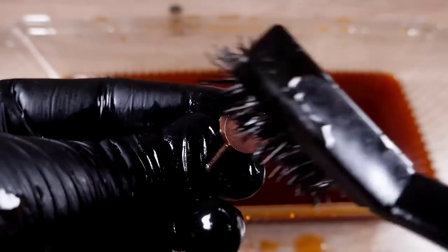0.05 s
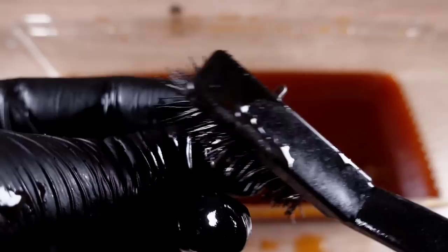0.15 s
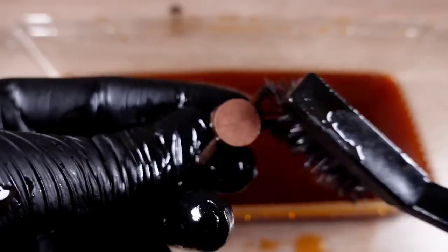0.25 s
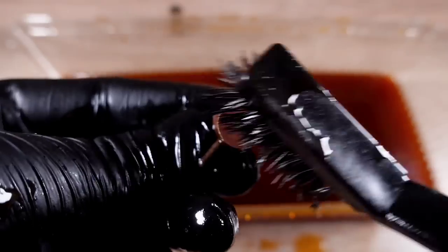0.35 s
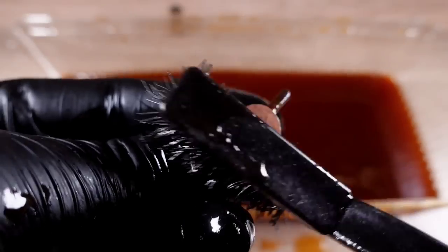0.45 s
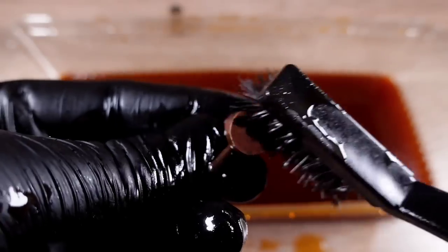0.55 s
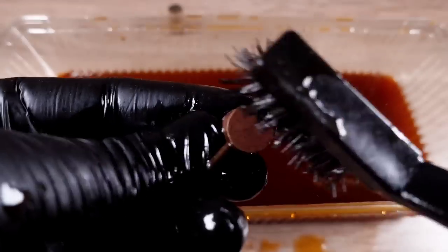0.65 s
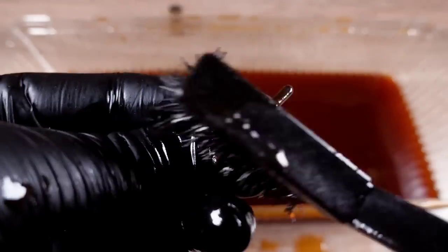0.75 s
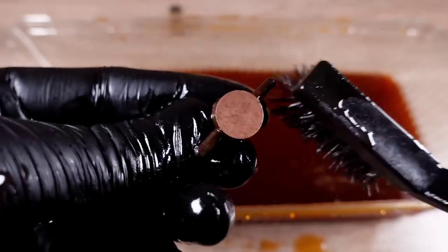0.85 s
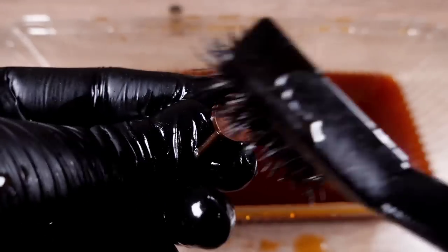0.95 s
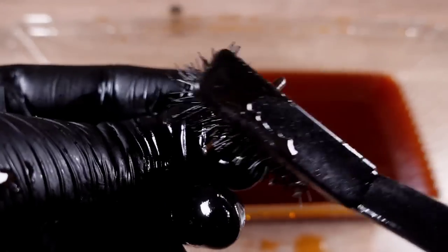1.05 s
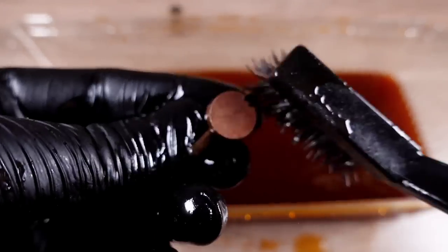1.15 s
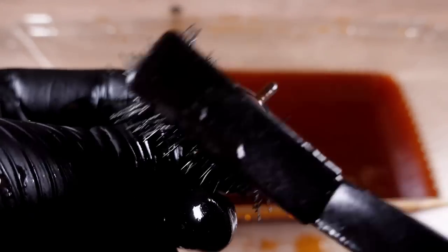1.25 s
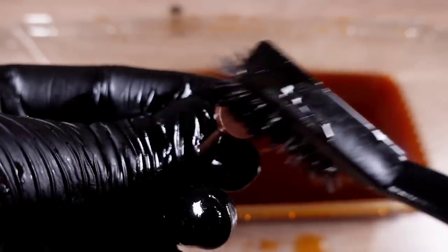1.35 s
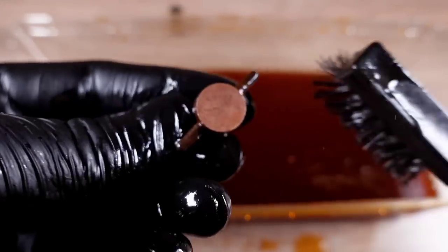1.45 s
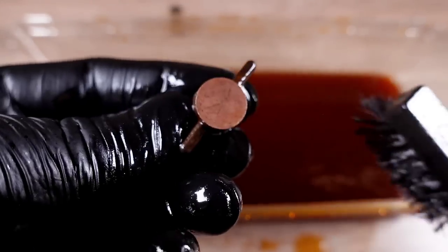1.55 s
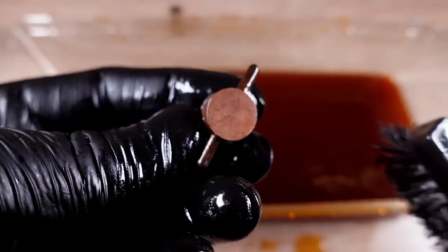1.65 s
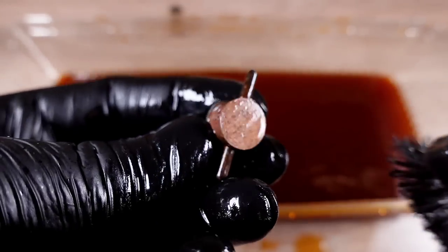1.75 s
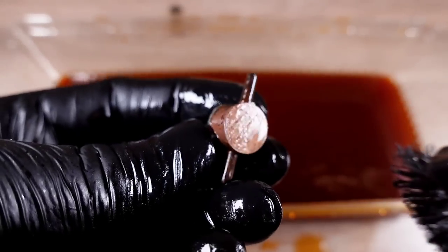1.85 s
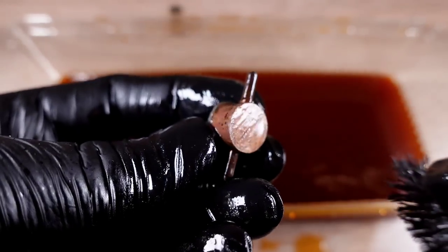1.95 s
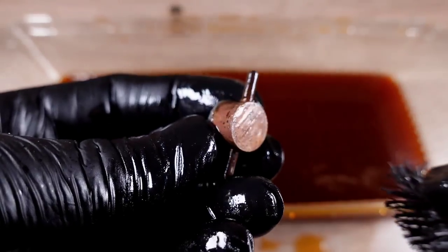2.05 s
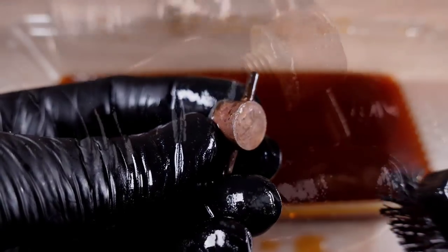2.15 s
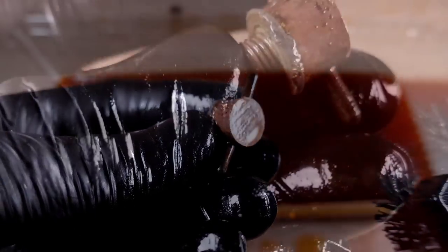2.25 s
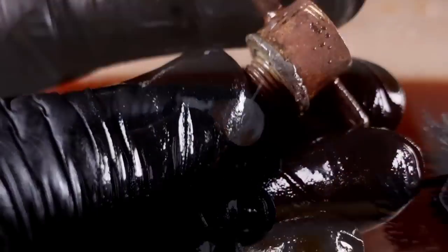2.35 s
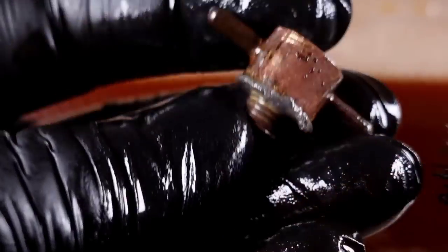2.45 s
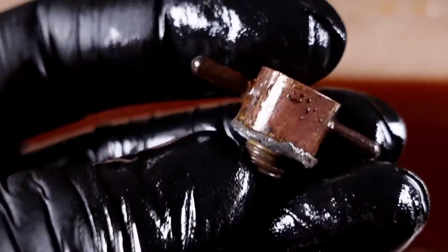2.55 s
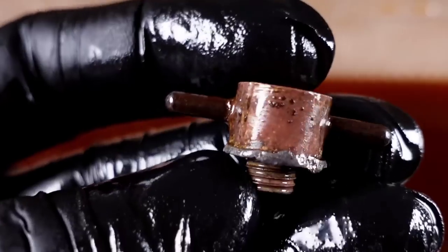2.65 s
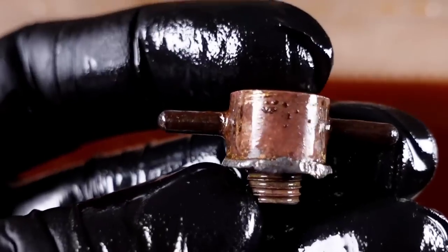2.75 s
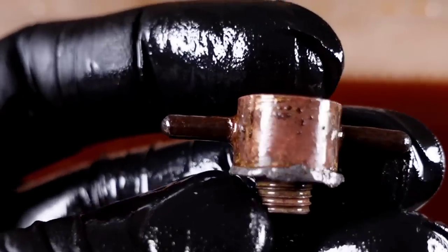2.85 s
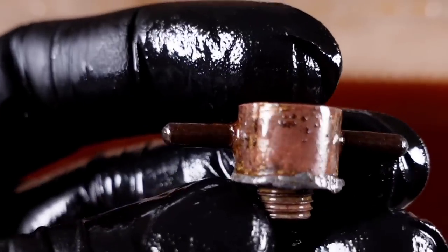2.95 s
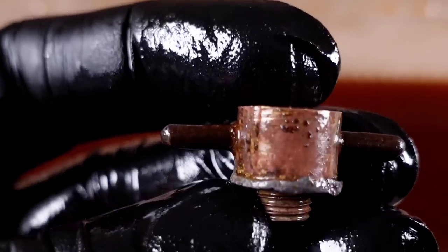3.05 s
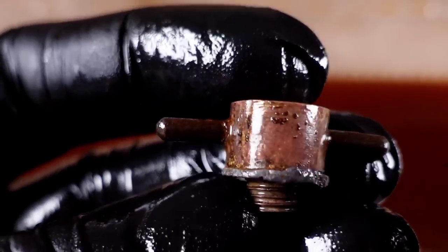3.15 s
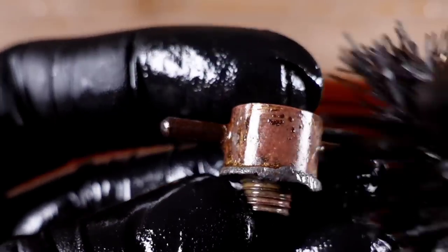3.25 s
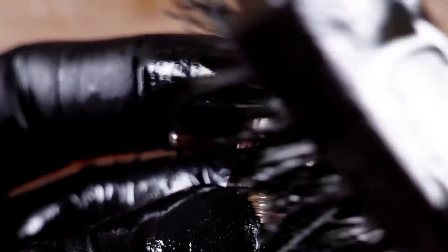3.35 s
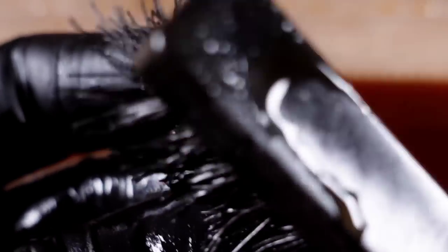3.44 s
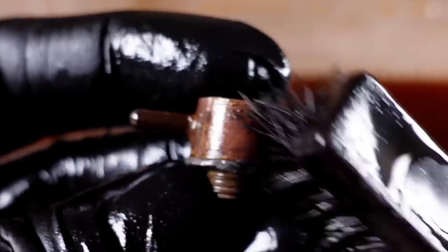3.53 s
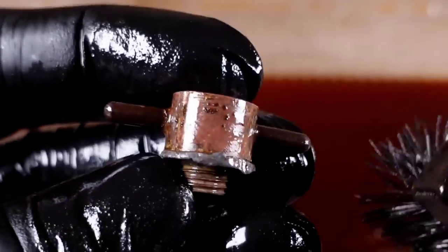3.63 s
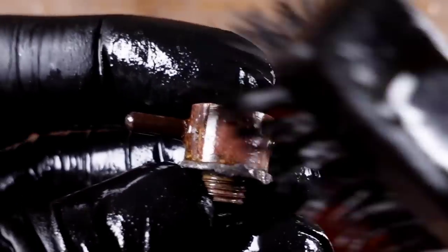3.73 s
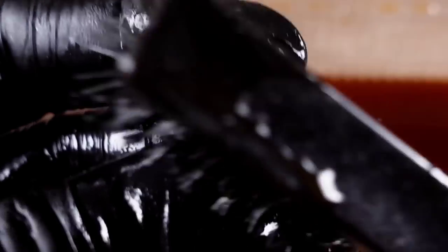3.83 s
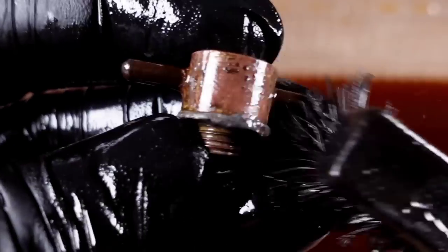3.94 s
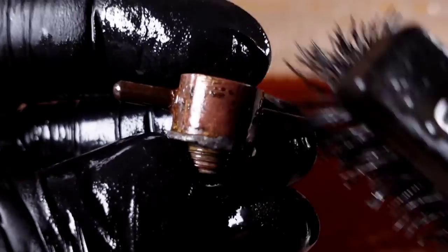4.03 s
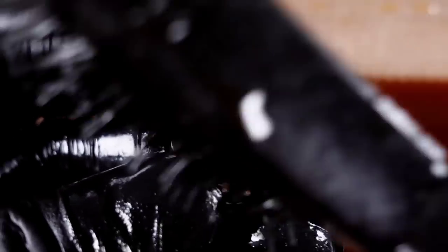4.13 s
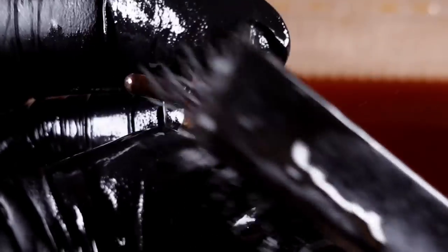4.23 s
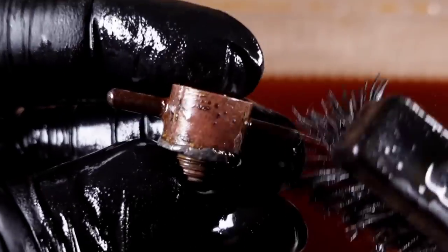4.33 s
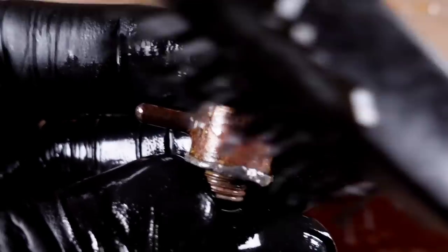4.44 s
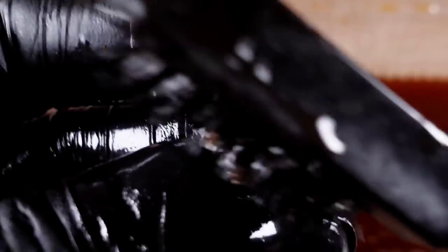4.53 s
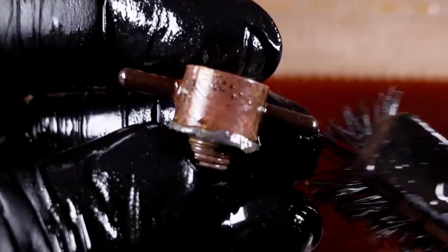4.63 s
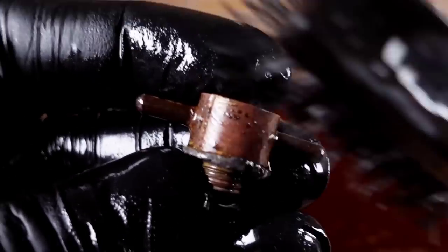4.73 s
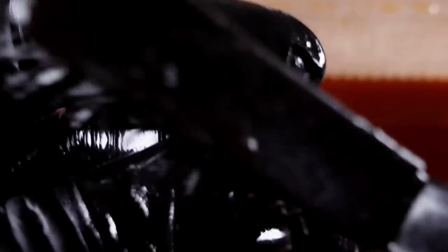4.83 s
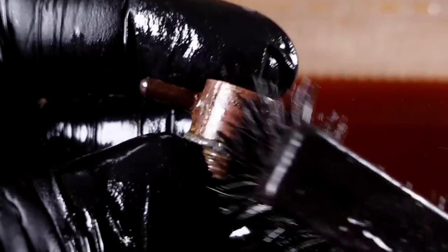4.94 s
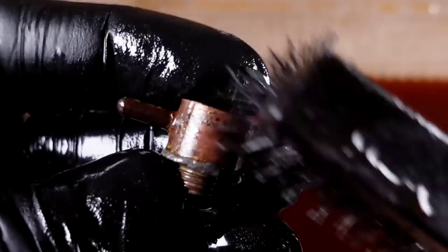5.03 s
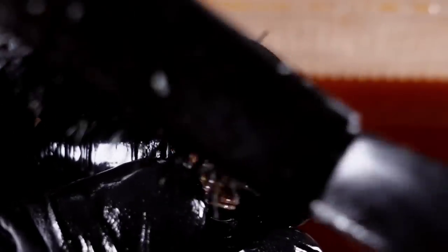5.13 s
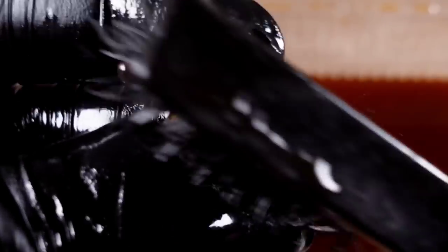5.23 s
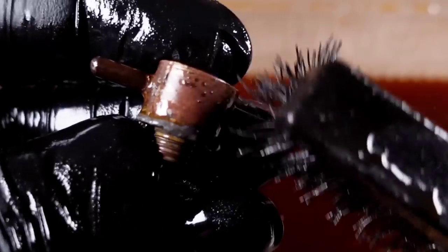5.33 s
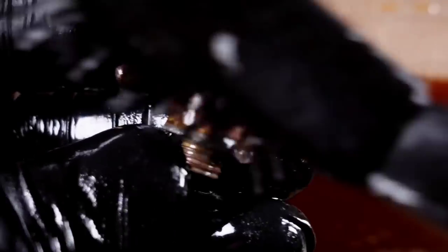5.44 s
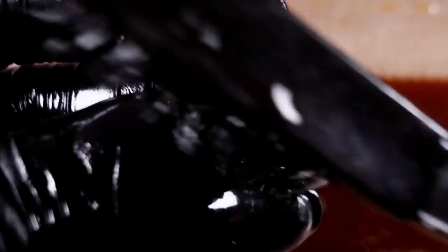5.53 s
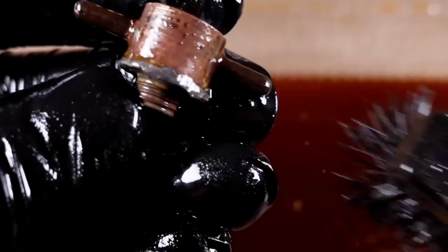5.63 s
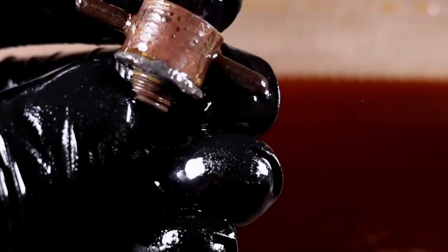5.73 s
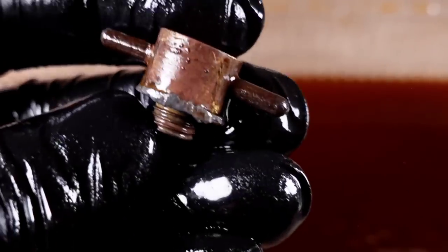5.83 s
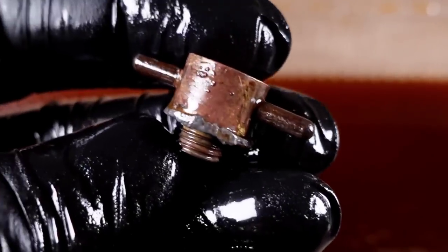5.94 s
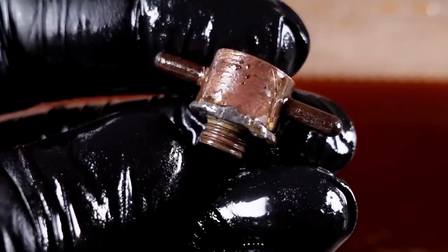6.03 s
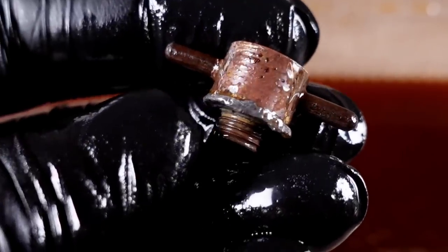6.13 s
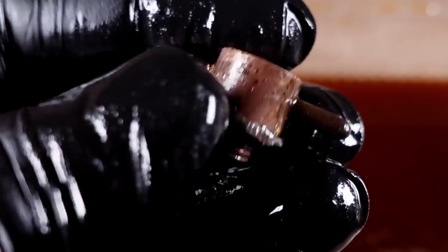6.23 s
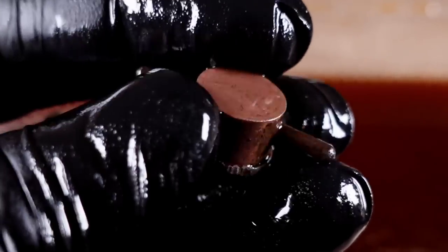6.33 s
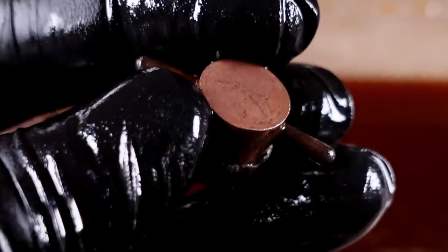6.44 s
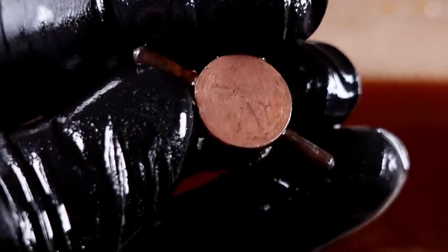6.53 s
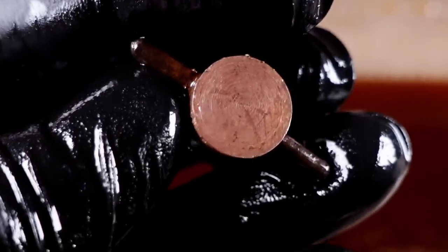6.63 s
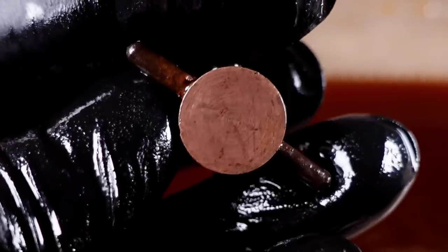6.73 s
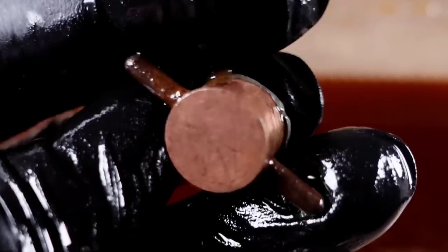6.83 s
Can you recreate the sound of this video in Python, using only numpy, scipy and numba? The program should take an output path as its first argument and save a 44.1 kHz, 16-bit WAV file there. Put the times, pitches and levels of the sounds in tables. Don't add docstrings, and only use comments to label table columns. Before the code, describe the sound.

Short, dry brush strokes on metal, crisp and spitting, recorded close in a small room. The first group is irregular and light with soft hand bumps; after a quiet gap of barely audible rubber rubbing, a steadier, stronger group rasps about three times a second, bristles flicking off the rim with brief dull rings. It ends on a hard knock, then faint glove ticks above low rumble and wavering machine hum.

```python
import sys
import numpy as np
from scipy import signal
from scipy.fft import rfft, irfft, next_fast_len
from scipy.io import wavfile
from scipy.ndimage import uniform_filter1d
from numba import njit

SR = 44100
rng = np.random.default_rng(int(sys.argv[2]) if len(sys.argv) > 2 else 0)


def undo_db(level):
    steps = np.asarray(level, float) / 20
    return 10 ** steps


def store_pcm(level_fs):
    pcm = np.round(np.clip(level_fs, -1, 1) * 32767).astype(np.int16)
    wavfile.write(sys.argv[1], SR, np.atleast_2d(pcm).T)


N = 303849
T = np.arange(N) / SR
REGRIP_S = 2.5


def level(x, db):
    return x * undo_db(db) / np.sqrt(np.mean(x ** 2))


def colour(x, points):
    hz, db = np.transpose(points)
    size = next_fast_len(len(x))
    f = np.arange(size // 2 + 1) * SR / size + 1
    gain_db = np.interp(np.log(f), np.log(hz), db)
    return irfft(rfft(x, size) * undo_db(gain_db), size)[:len(x)]


def mode(x, hz, t60):
    pole = np.exp(2j * np.pi * hz / SR - np.log(1000) / (t60 * SR))
    return signal.lfilter([1], [1, -pole], x).imag


def narrow(hz, width, count=N):
    t60 = np.log(1000) / (np.pi * width)
    return level(mode(rng.standard_normal(count), hz, t60), 0)


def walk(rate):
    k = int(SR / rate)
    held = np.repeat(rng.standard_normal(N // k + 1), k)
    return 1.262 * uniform_filter1d(uniform_filter1d(held, k), k)[:N]


def samples(s):
    return (s * SR).astype(np.int64)


@njit
def grains(length, start, hz, cycles, size):
    out = np.zeros(length)
    for k in range(len(start)):
        rise = cycles[k] * SR / hz[k]
        pole = np.exp(2j * np.pi * hz[k] / SR - 1 / rise)
        z = size[k] * np.e / rise + 0j
        for i in range(min(length - start[k], int(9 * rise))):
            out[start[k] + i] += i * z.imag
            z *= pole
    return out


def fading(s, db, fall_s):
    starts = np.bincount(samples(s), undo_db(db), N)
    steps = signal.lfilter([1], [1, -np.exp(-1 / (fall_s * SR))], starts)
    return uniform_filter1d(steps, int(.0019 * SR))


def body(x, modes):
    out = np.zeros(N)
    for k, (hz, face_db, side_db, t60) in enumerate(modes):
        weight = np.where(T < REGRIP_S, undo_db(face_db), undo_db(side_db))
        out += (-1) ** k * weight * mode(x, hz, t60)
    return out


# start_s, peak_db
FACE_SNAPS = [(0.012, -22), (0.021, -27), (0.04, -22), (.2661, -32), (.2804, -25), (0.3153, -39),
              (.3207, -31), (.567, -28), (.5715, -36), (.5831, -27), (0.6018, -33), (0.6455, -26),
              (.6906, -43), (.702, -47), (.719, -37), (0.833, -36.5), (0.862, -31), (0.876, -25),
              (.887, -27), (.903, -25), (0.9125, -27), (0.9277, -35), (1.134, -31), (1.1475, -28),
              (1.1963, -34), (1.2165, -37), (1.292, -34), (1.3906, -29), (1.439, -21), (1.462, -35)]
# start_s, peak_db
PECKS = [(0.533, -40), (1.3767, -37), (1.407, -29), (1.455, -32), (3.5384, -43), (3.5474, -36),
         (3.558, -32), (3.606, -33), (3.829, -50), (3.9181, -40), (3.9348, -26), (3.954, -29), (3.962, -26),
         (4.277, -32), (4.291, -17.5), (4.586, -54), (4.6027, -47), (4.9162, -23.5), (4.9282, -39),
         (4.938, -21), (4.952, -42), (5.2545, -30), (5.26, -29), (5.2733, -25.5), (5.2793, -40.5),
         (5.2996, -41), (5.575, -29), (5.598, -25), (5.617, -39)]
# start_s, peak_db
SIDE_SNAPS = [(3.6134, -29), (3.6194, -17.5), (3.626, -23), (3.6306, -24), (3.993, -30), (4.0122, -23),
              (4.3076, -33), (4.3277, -38), (4.341, -20), (4.635, -18), (4.6527, -15), (4.9662, -14),
              (4.9738, -29), (4.978, -25.5), (4.992, -41), (4.9983, -38), (5.1053, -28), (5.315, -13),
              (5.3248, -17), (5.339, -14), (5.6339, -14), (5.6401, -17), (5.649, -15)]
# start_s, brass_peak_db
RIM_SNAPS = [(.2286, -46), (.511, -50), (0.8247, -48), (1.1147, -46.5), (3.91, -50), (3.6573, -27.5),
             (3.6655, -32), (3.6892, -48.5), (4.0318, -29.5), (4.0423, -35), (4.068, -44), (4.0796, -38),
             (4.3847, -20), (4.687, -18.5), (4.702, -25), (4.7435, -47), (5.02, -41), (5.045, -24),
             (5.0517, -31), (5.0668, -25), (5.0779, -41), (5.086, -30), (5.371, -33), (5.388, -25),
             (5.6858, -15), (5.703, -29.5)]
# wire_pitch_hz, wires_above_row_db, brass_above_row_db
SNAP_KINDS = [
    (10540, -3, -18.5),
    (10660, -3.5, -17),
    (11500, -3, -20),
    (8800, -11, -1),
]


def tufts():
    snap_rows = []
    for events, (hz, wire_db, brass_db) in zip((FACE_SNAPS, PECKS, SIDE_SNAPS, RIM_SNAPS), SNAP_KINDS):
        snap_rows += [(s, db + wire_db, hz, db + brass_db) for s, db in events]
    return np.transpose(snap_rows)


GRAZE_DB, SWELL_POWER = (-52, -56.5), (1.4, 1.8)
RIM_SHARE = (0.25, 0.57)
BRASS_GRAZE_DB, BRASS_BITE_DB, BRASS_RIM_DB, BRASS_LIFT_DB = (-3, -1), (-5.5, -10.5), (-3.5, -2.5), (-4.5, 4.5)
HANDLE_GRAZE_DB, HANDLE_BITE_DB, HANDLE_LIFT_DB = (-61, -66.5), (-49.5, -49), (-52.5, -61)
HANDLE_LAG = (0.13, 0.25)
HANDLE_SHARE = 0.41
LAND_S, LAND_DB = 0.01, -24
FADE_DB_S = (900, 850, 382)


def stroke_db(t, touch, bite, lift, db, lift_db):
    grip = int(touch > REGRIP_S)
    graze = GRAZE_DB[grip]
    rim = bite + RIM_SHARE[grip] * (lift - bite)
    shake = bite + HANDLE_LAG[grip] * (lift - bite)
    force = HANDLE_SHARE * (db + 37)
    swell = np.clip((t - touch) / (bite - touch), 0, 1) ** SWELL_POWER[grip]

    def press(start_db, s, dbs):
        return start_db + swell * (np.interp(t, s, dbs) - start_db)

    bristles = press(graze, [bite, lift], [db, lift_db])
    brass_dbs = [db + BRASS_BITE_DB[grip], db + BRASS_RIM_DB[grip], lift_db + BRASS_LIFT_DB[grip]]
    brass = press(graze + BRASS_GRAZE_DB[grip], [bite, rim, lift], brass_dbs)
    handle_dbs = [HANDLE_GRAZE_DB[grip], force + HANDLE_BITE_DB[grip], force + HANDLE_LIFT_DB[grip]]
    handle = np.interp(t, [touch, shake, lift], handle_dbs)
    landing = LAND_DB * np.maximum(touch - t, 0) / LAND_S
    fade = np.outer(FADE_DB_S, np.maximum(t - lift, 0))
    return np.array([bristles, brass, handle]) + landing - fade


# first_touch_s, full_bite_s, last_lift_s
STROKES = [(-.04, .022, .042), (.255, .322, .338), (.552, .575, .69), (.857, .915, .932),
           (1.13, 1.195, 1.222), (1.383, 1.44, 1.476), (3.542, 3.624, 3.69), (3.93, 4.01, 4.08),
           (4.255, 4.32, 4.392), (4.585, 4.636, 4.74), (4.912, 4.97, 5.092), (5.252, 5.322, 5.402),
           (5.57, 5.638, 5.7)]
# bristles_at_bite_db, bristles_at_lift_db
FORCES = [(-36.5, -44.5), (-38.5, -42), (-48.5, -51), (-38.5, -45), (-41, -41), (-35.5, -38), (-38, -56),
          (-39, -62), (-37.5, -40.5), (-32.5, -53.5), (-35.5, -53), (-37, -50.5), (-30, -46.5)]
# start_s, peak_db
ROWS = [(0.2576, -39), (0.3014, -36), (0.553, -38), (0.6, -22), (0.6315, -18.5), (0.661, -19),
        (1.1762, -19), (3.98, -18), (4.2583, -51), (4.3586, -26), (4.627, -18.5), (5.0315, -12),
        (5.3047, -11), (5.646, -14)]
# freq_hz, gain_db
BRISTLE = [(1760, -75), (3000, -1), (4070, -16), (4610, -13.5), (6000, -9), (7380, -2.5), (9020, -7.5),
           (9870, 0), (15700, -3.5)]
# pitch_hz, face_db, side_db, t60_s
BRASS = [(3580, -4, -5.5, 0.0053), (4560, 2, 3, 0.0078), (4780, -2, 1.4, 0.0078), (5450, -1.5, 1, 0.0052),
         (6510, -6, 0, 0.005), (7410, -3.5, -4.5, 0.0075), (8500, -1, -7, 0.0055)]
# pitch_hz, face_db, side_db, t60_s
HANDLE = [(247, 0.5, -5, 0.01), (439, -5, -9, 0.033), (690, -5, -8, 0.018), (925, -6, -4, 0.025),
          (1544, 0.5, 2.5, 0.0088), (2062, -2.5, 1.5, 0.011), (2790, 2.5, 3.5, 0.0071)]
SLIPS_PER_S, SLIP_SCATTER_DB = 9000, 4
TUFT_DB, TUFT_RATE = 3, 180
CLUMP_DB, CLUMP_RATE = 1.5, 70
PATCH_DB, PATCH_RATE = 2.5, 45
FLURRY_DB, FLURRY_S = -14.5, 0.0025
ROW_DB, ROW_S = -23, 0.014


def scrub():
    count = int(SLIPS_PER_S * N / SR)
    when, strength, shortness, twist = rng.random((count, 4)).T
    start = (when * N).astype(np.int64)
    size = undo_db(-SLIP_SCATTER_DB * np.log(1 - .985 * strength)) * np.sign(twist - .5)
    blows = np.bincount(start, size, N)

    drift = np.array([walk(PATCH_RATE) for _ in range(5)])
    patches = drift[(shortness * 5).astype(np.int64), start]
    pitch, cycles = 3500 + 13000 * shortness, 1.0 + 1.9 * twist ** 2
    wires = grains(N, start, pitch, cycles, size * undo_db(PATCH_DB * patches))
    bristles = level(colour(wires, BRISTLE), 0)
    brass = level(body(blows, BRASS), 0)
    handle = level(body(blows, HANDLE), 0)

    gains = np.zeros((3, N))
    trim_db = np.array([[1.5], [5.5], [1.5]])
    for stroke, force in zip(STROKES, FORCES):
        on = (T > stroke[0] - .05) & (T < stroke[2] + .2)
        gains[:, on] += undo_db(stroke_db(T[on], *stroke, *force) - trim_db)
    clumps = CLUMP_DB * walk(CLUMP_RATE) * np.array([[1], [1], [.5]])
    flutter = np.array([undo_db(TUFT_DB * walk(TUFT_RATE)) for _ in range(3)])
    gains *= undo_db(clumps - 0.97) * flutter

    s, db = tufts()[:2]
    gains[0] += fading(s, db + FLURRY_DB, FLURRY_S)
    s, db = np.transpose(ROWS)
    gains[0] += fading(s, db + ROW_DB, ROW_S)
    return gains[0] * bristles + gains[1] * brass + gains[2] * handle


def drone(hz, db):
    phase = 2 * np.pi * np.cumsum(hz * (1 + .035 * walk(11))) / SR
    tone = undo_db(4.0 * walk(14)) * np.sin(phase)
    return undo_db(db) * (tone + undo_db(1.0) * narrow(hz, 0.28 * hz))


# freq_hz, gain_db
SHOP = [(11, -31), (18, -2.5), (38, -3.5), (52, -4.5), (74, -11.5), (169, -17.5), (244, -18), (315, -23),
        (848, -30), (5500, -38), (15700, -45)]
# start_s, length_s, level_db
SPELLS = [
    (0.207, 0.25, -67),
    (.62, 0.87, -63),
    (1.876, 0.52, -61),
    (2.367, 0.19, -56.5),
    (2.838, 0.18, -60.5),
    (3.1, 0.89, -69),
    (4.925, 0.557, -58),
    (5.59, 0.49, -58.5),
    (6.55, 0.2, -64.5),
]
# time_s, level_db
LOW_DRONE = [
    (0, -68),
    (.29, -59),
    (.55, -63),
    (1.4, -65),
    (2.3, -64),
    (3.0, -79),
    (3.8, -67),
    (4.1, -62),
    (6.89, -59.5),
]


def shop():
    noise = level(colour(rng.standard_normal(N), SHOP), -58)
    rumble = signal.sosfilt(signal.butter(2, 400, fs=SR, output="sos"), noise)
    spells = np.zeros(N)
    for s, length, db in SPELLS:
        edge = np.minimum(T - s, s + length - T) / .05 + .5
        spells += undo_db(db) * np.clip(edge, 0, 1) ** 2
    low_db = np.interp(T, *np.transpose(LOW_DRONE))
    drones = spells * drone(249, -7.0) + drone(106, low_db - 6.5)
    wander = undo_db(1.0 * walk(2.3)) - 1
    return noise * undo_db(0.21 * walk(2)) + wander * rumble + drones


def snaps():
    s, db, hz, brass_db = tufts()
    hz = hz * (1 + .08 * rng.standard_normal(len(s)))
    u = rng.random((len(s), 3, 7))
    late = u[:, 0] * (np.arange(7) > 0)
    size = undo_db(db[:, None] - 5.5 - 18.0 * np.abs(late - .2))
    pitch = np.clip(hz[:, None] * 1.25 ** (2 * u[:, 1] - 1), 5000, 15500)
    start = samples(s[:, None] - .0005 + 0.0022 * late)
    cycles = 0.58 + 1.6 * u[:, 2]
    wires = grains(N, start.ravel(), pitch.ravel(), cycles.ravel(), size.ravel())
    blows = np.bincount(samples(s) - 6, undo_db(brass_db - 4.0), N)
    return wires + body(blows, BRASS) + undo_db(-25) * body(blows, HANDLE)


# start_s, peak_db, pitch_hz, swell_cycles
BUMPS = [(.012, -53, 690, 5.7), (.07, -54.5, 530, 5.8), (.31, -52, 440, 3.9), (.38, -59, 694, 5.2),
         (.432, -60, 430, 1.7), (.435, -56, 850, 5.1), (.755, -59, 973, 6.5), (.905, -51.5, 440, 3.5),
         (.985, -55, 680, 5.9), (1.122, -52.5, 673, 4.5), (1.185, -55, 428, 3), (1.195, -58, 915, 5.5),
         (1.28, -56.5, 690, 4.7), (1.283, -56.5, 322, 2.5), (3.7, -57.5, 696, 5.4), (5.14, -60, 516, 5.5)]


def hand_bumps():
    s, db, hz, cycles = np.transpose(BUMPS)
    u = rng.random((len(s), 2, 4))
    u[:, :, 0] = .5
    start = samples(np.abs(s[:, None] + .014 * (2 * u[:, 0] - 1)))
    pitch = hz[:, None] * (1 + .16 * 4 * (u[:, 1] - .5))
    size = undo_db(db[:, None] - 1.5 - 8.0 * (np.arange(4) > 0))
    swell = np.repeat(0.89 * cycles, 4)
    return grains(N, start.ravel(), pitch.ravel(), swell, size.ravel())


# centre_s, half_length_s, pitch_hz, width_hz, level_db
RUBS = [(0.091, .04, 850, 300, -60.5), (0.181, 0.046, 690, 90, -66.5), (1.029, .06, 5000, 900, -69),
        (2.532, .1, 5600, 1400, -75), (2.973, 0.13, 5230, 1500, -74), (3.233, 0.13, 4800, 1500, -78),
        (4.832, .09, 3200, 140, -69.5), (4.84, 0.061, 2320, 60, -70), (5.15, 0.067, 910, 500, -61.5),
        (5.47, .04, 3200, 120, -71), (6.302, .025, 5600, 500, -69), (6.385, .05, 5400, 400, -74),
        (6.845, 0.076, 5240, 1200, -71)]


def glove_rubs():
    out = np.zeros(N)
    for s, length, hz, width, db in RUBS:
        near = np.abs(T - s) < length
        swell = np.cos(np.pi / 2 * (T[near] - s) / length) ** 2
        out[near] += undo_db(db) * swell * narrow(hz, width, count=near.sum())
    return out


# start_s, peak_db
KNOCKS = [
    (1.438, -23.5),
    (4.3819, -27),
    (4.6872, -38),
    (5.6869, -17.5),
]
# pitch_hz, level_db, t60_s
KNOCK = [(1002, -14.5, 0.071), (4400, 0, 0.0055), (4800, 5, 0.0059), (5600, 7, 0.0095), (6100, -8, 0.007),
         (7000, -12, 0.0061), (8150, -19, .004)]


def knocks():
    s, db = np.transpose(KNOCKS)
    blows = np.bincount(samples(s) - 4, undo_db(db - 13.0), N)
    blows = blows - undo_db(-9.0) * np.roll(blows, int(0.001274 * SR))
    return sum(undo_db(mode_db) * mode(blows, hz, t60) for hz, mode_db, t60 in KNOCK)


# start_s, peak_db, pitch_hz
TICKS = [
    (2.4019, -48, 5060),
    (2.4523, -42.5, 10200),
    (3.5049, -54, 4620),
    (6.2836, -51, 5600),
    (6.2931, -52, 5800),
    (6.2955, -53, 2680),
    (6.4487, -56, 3900),
    (6.451, -56, 5920),
    (6.4744, -59, 4110),
]


def glove_ticks():
    s, db, hz = np.transpose(TICKS)
    return grains(N, samples(s), 1. * hz, 2.0 + 0 * s, undo_db(db - 3.5))


BENCH_ECHO_S, BENCH_ECHO_DB = .0036, -18
ROOM_T60_S, ROOM_DB = 0.16, -13
SHIFT_S = .03


def room(near):
    t = T[:int(ROOM_T60_S * SR)]
    out = np.zeros(N)
    for place in range(6):
        tail = rng.standard_normal(len(t)) * undo_db(-60 * t / ROOM_T60_S) * (t > BENCH_ECHO_S)
        tail = colour(tail, [(200, -4), (1500, 1.5), (5000, 0), (15000, -3.5)])
        tail *= undo_db(ROOM_DB) / np.sqrt(np.sum(tail ** 2))
        here = np.sqrt(np.clip(1 - np.abs((T / SHIFT_S - place) % 6 - 1), 0, 1))
        out += signal.fftconvolve(near * here, tail)[:N]
    return out


def scene():
    near = scrub() + snaps() + hand_bumps() + glove_rubs() + knocks() + glove_ticks()
    bench = undo_db(BENCH_ECHO_DB) * np.roll(near, int(BENCH_ECHO_S * SR))
    return (near + bench + shop() + room(near))[None]


def top_cut(x):
    return signal.sosfilt(signal.butter(12, 16660, fs=SR, output="sos"), x)


def record(dry):
    mix = signal.sosfilt(signal.ellip(10, .3, 45, 16050, fs=SR, output="sos"), dry)
    return top_cut(mix)


dry = scene()
out = record(dry)
store_pcm(out)
```